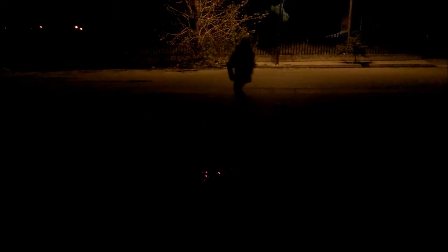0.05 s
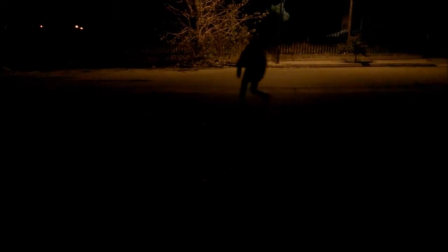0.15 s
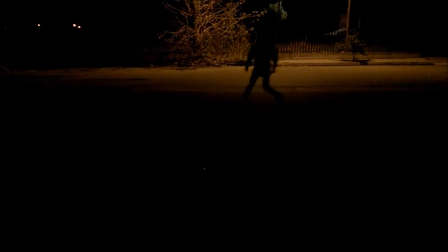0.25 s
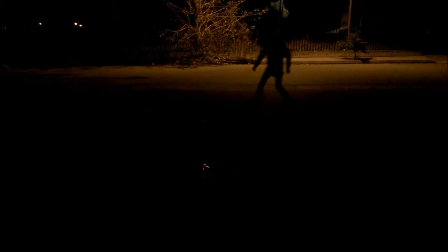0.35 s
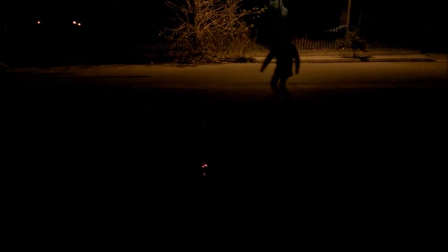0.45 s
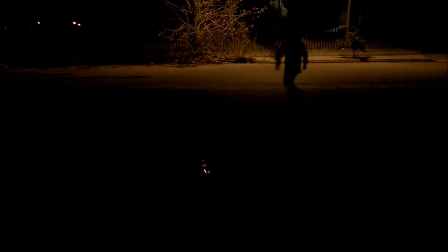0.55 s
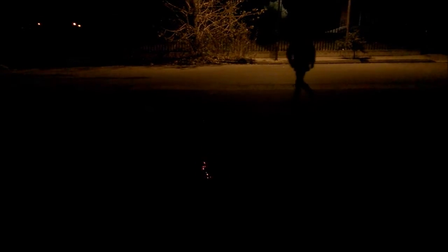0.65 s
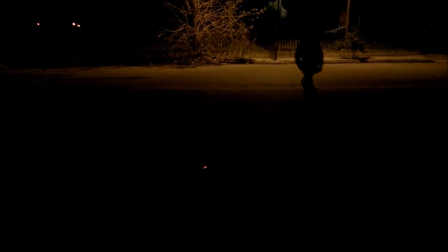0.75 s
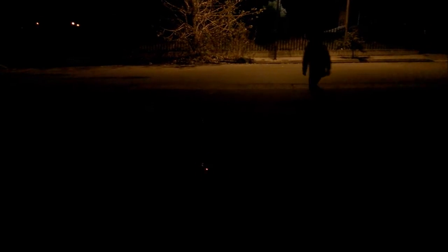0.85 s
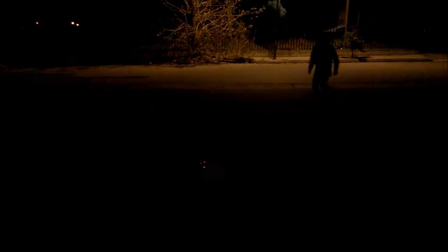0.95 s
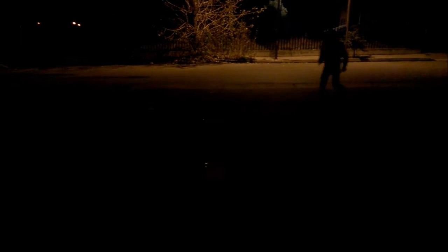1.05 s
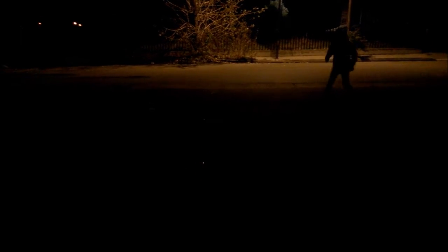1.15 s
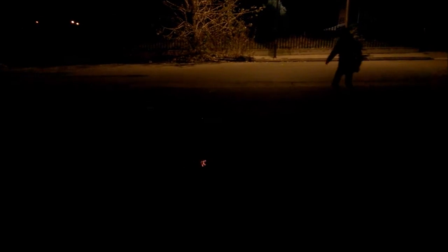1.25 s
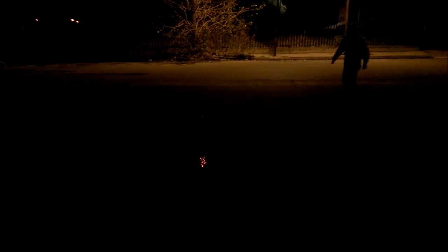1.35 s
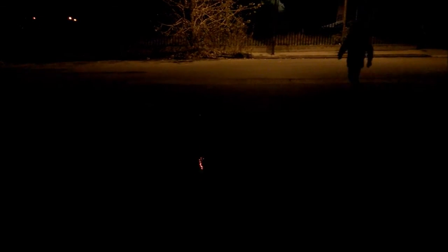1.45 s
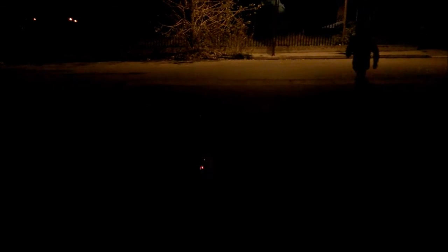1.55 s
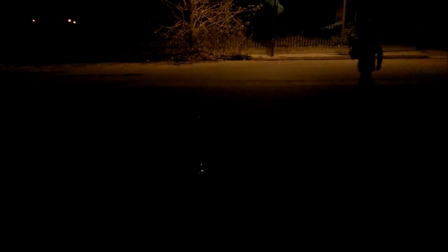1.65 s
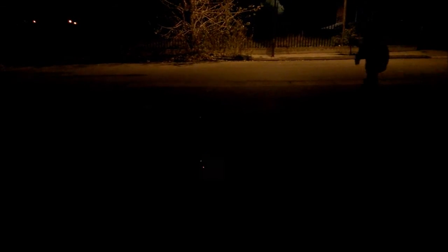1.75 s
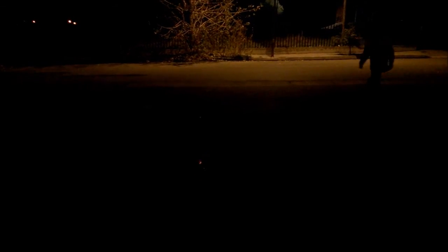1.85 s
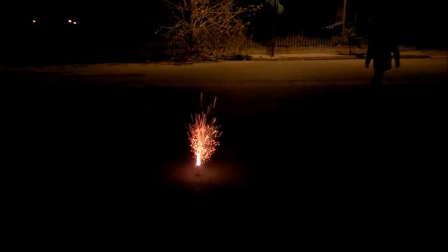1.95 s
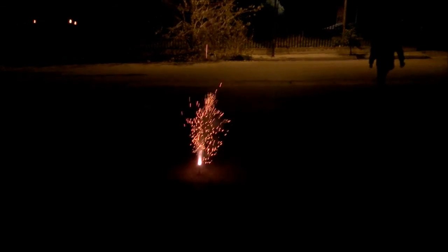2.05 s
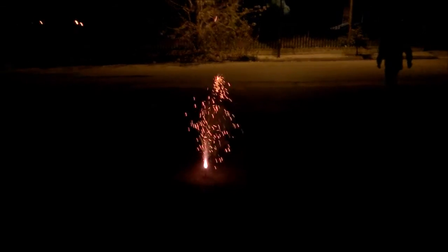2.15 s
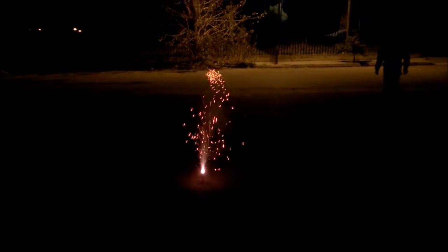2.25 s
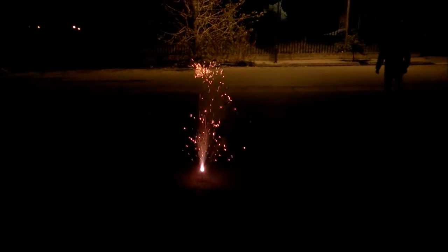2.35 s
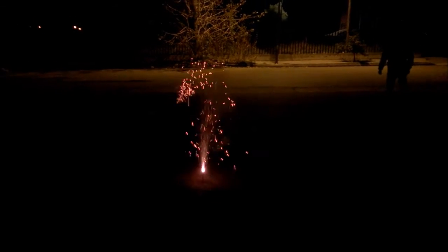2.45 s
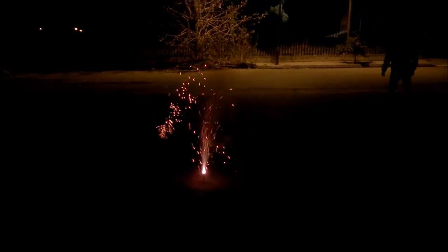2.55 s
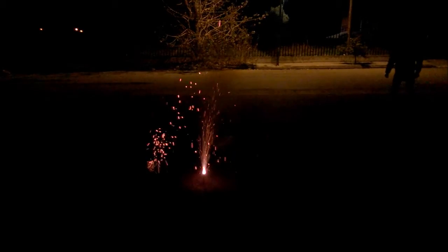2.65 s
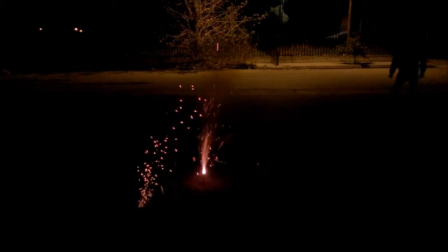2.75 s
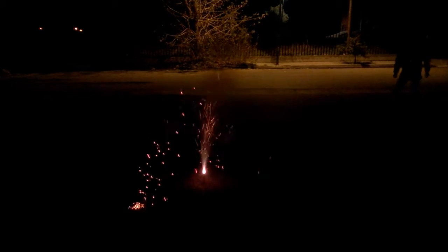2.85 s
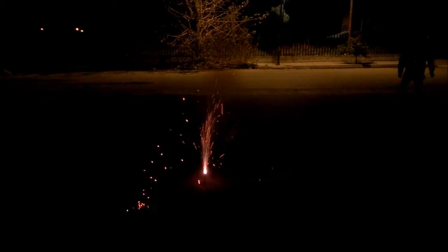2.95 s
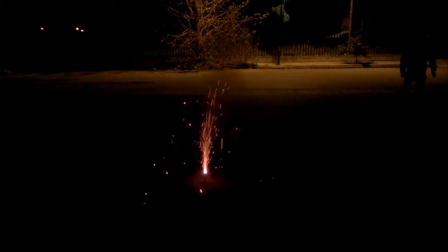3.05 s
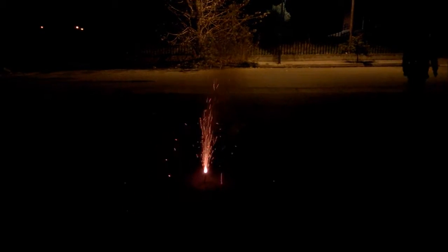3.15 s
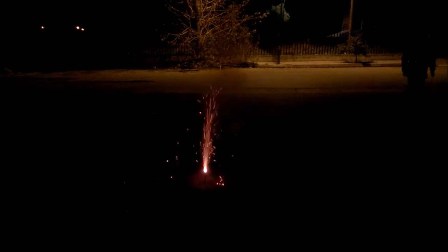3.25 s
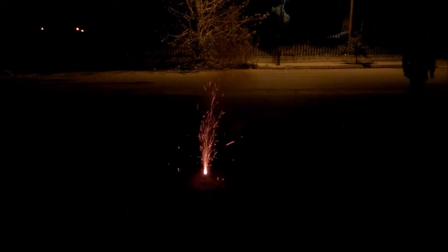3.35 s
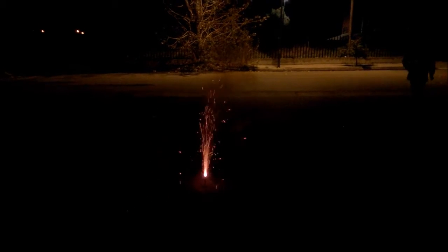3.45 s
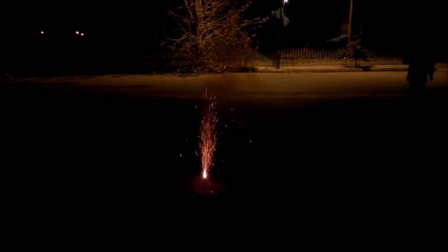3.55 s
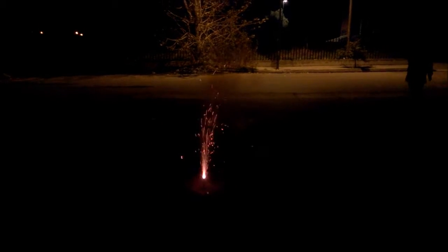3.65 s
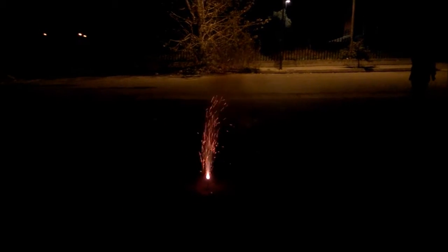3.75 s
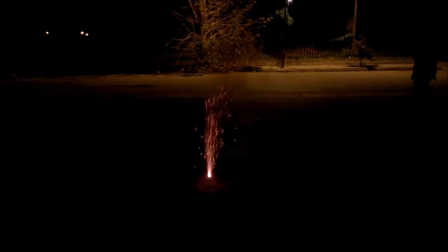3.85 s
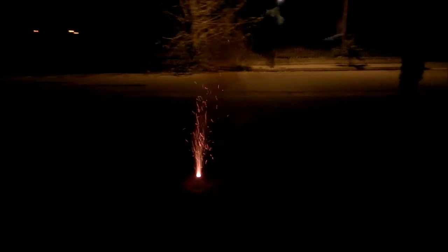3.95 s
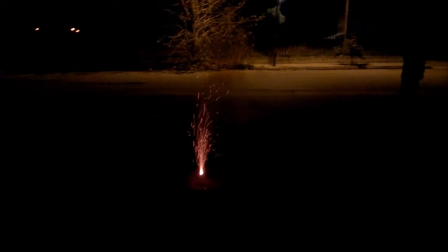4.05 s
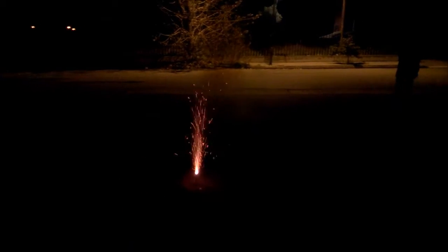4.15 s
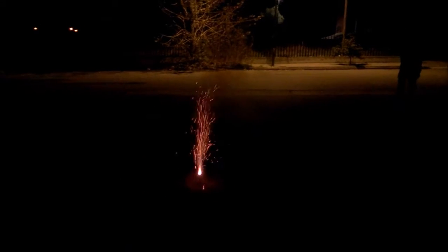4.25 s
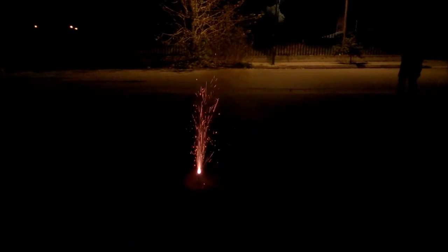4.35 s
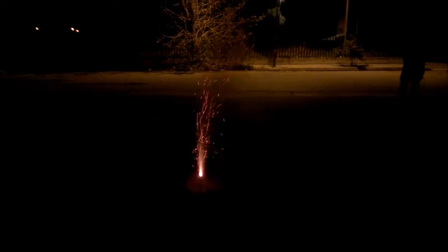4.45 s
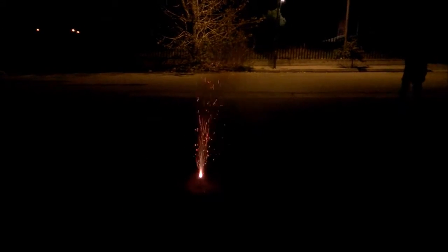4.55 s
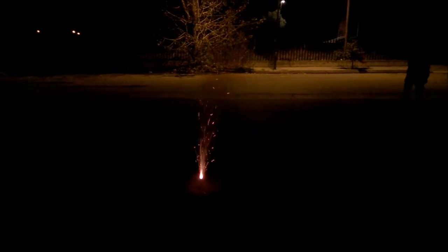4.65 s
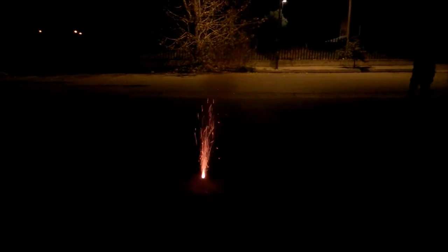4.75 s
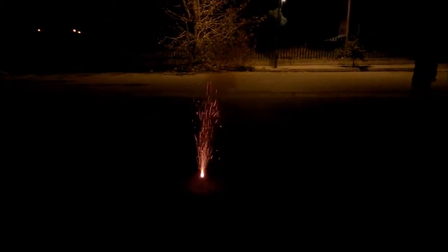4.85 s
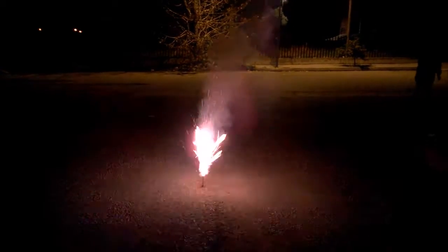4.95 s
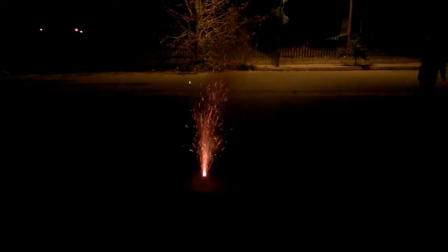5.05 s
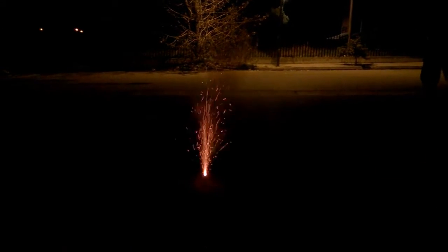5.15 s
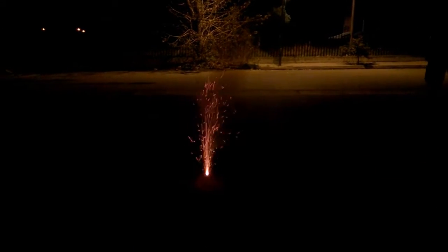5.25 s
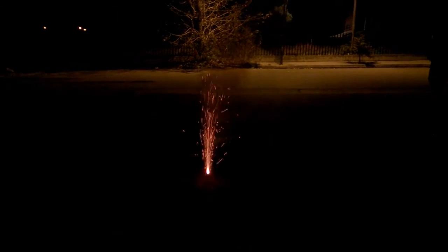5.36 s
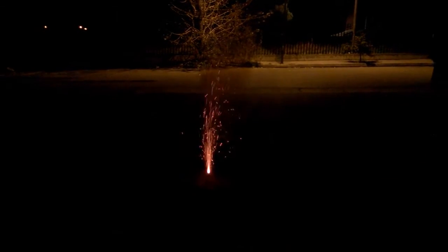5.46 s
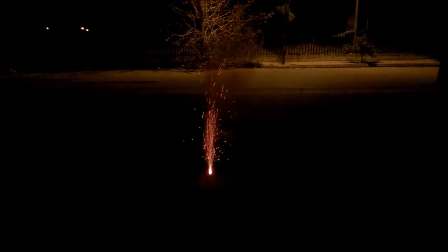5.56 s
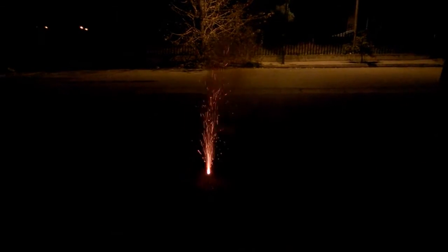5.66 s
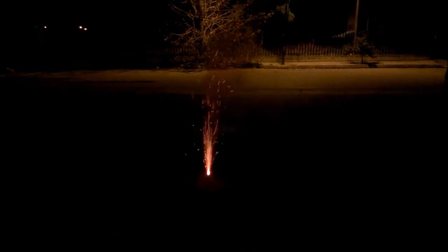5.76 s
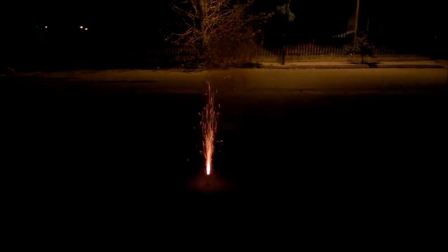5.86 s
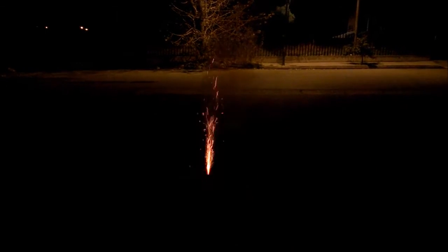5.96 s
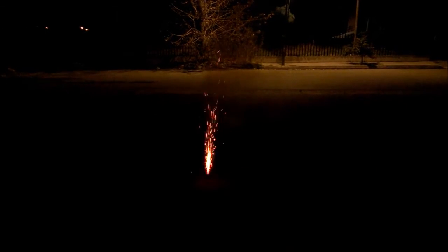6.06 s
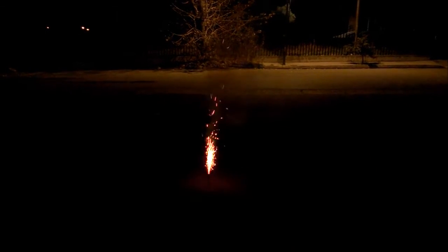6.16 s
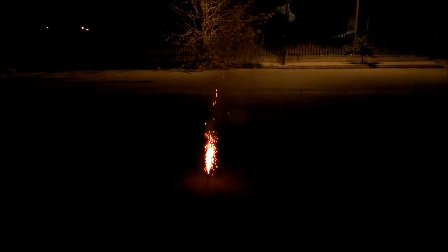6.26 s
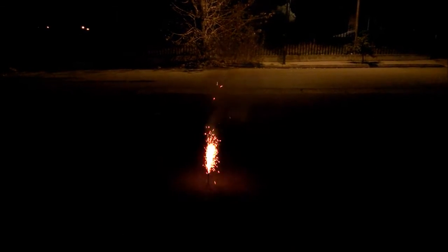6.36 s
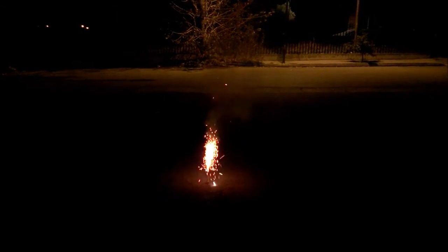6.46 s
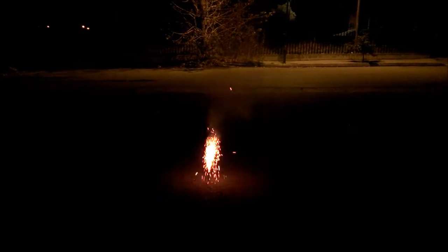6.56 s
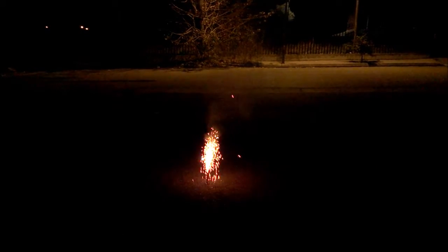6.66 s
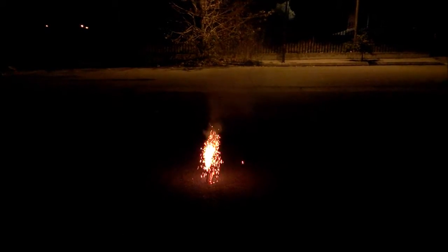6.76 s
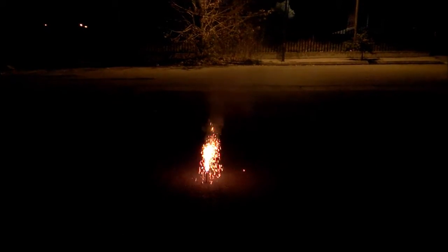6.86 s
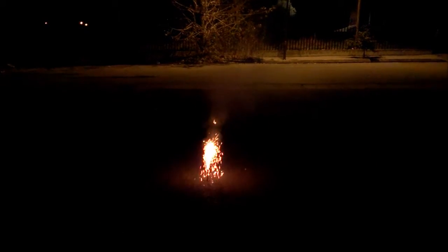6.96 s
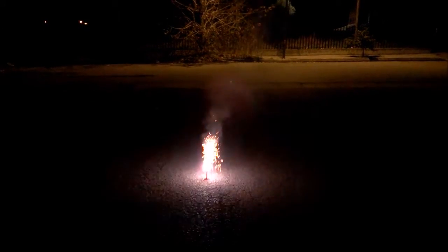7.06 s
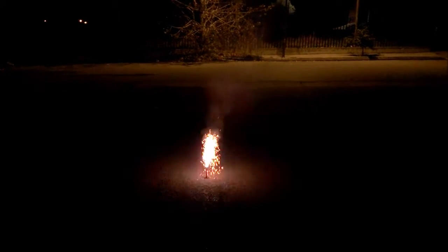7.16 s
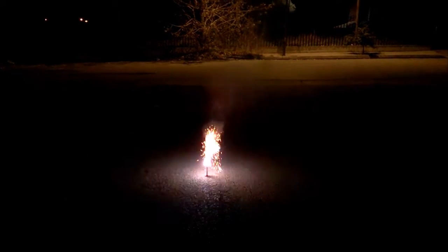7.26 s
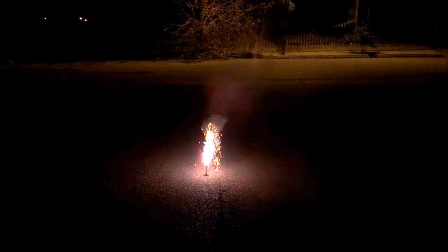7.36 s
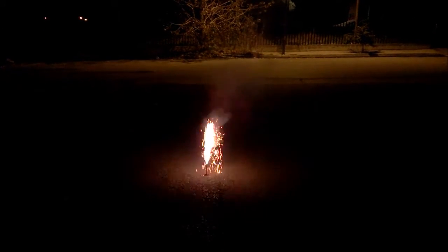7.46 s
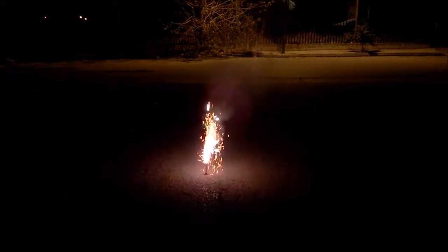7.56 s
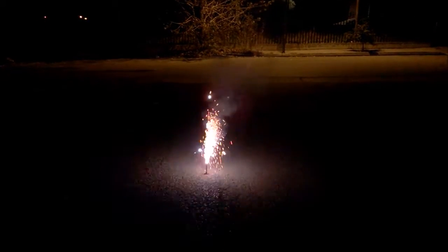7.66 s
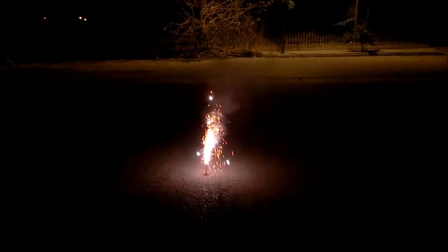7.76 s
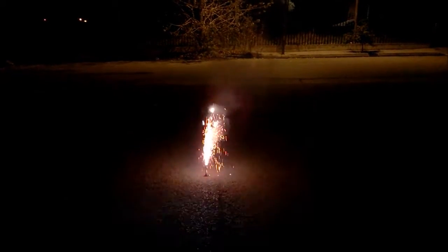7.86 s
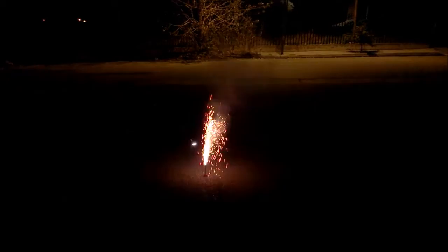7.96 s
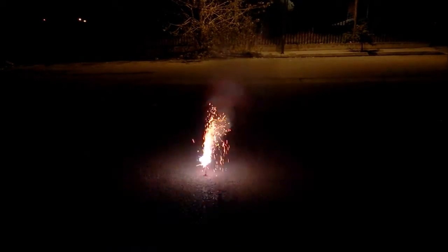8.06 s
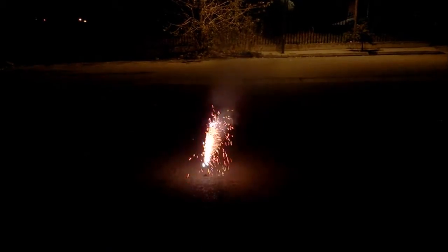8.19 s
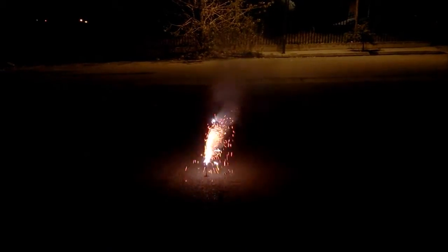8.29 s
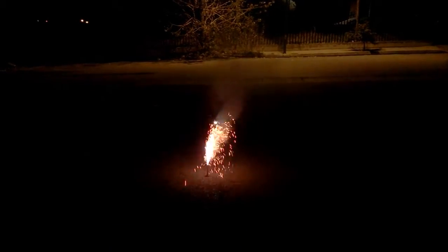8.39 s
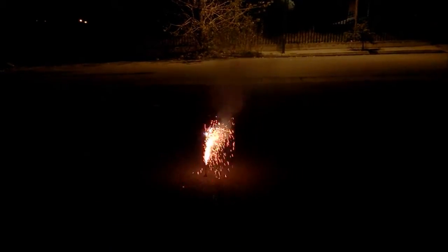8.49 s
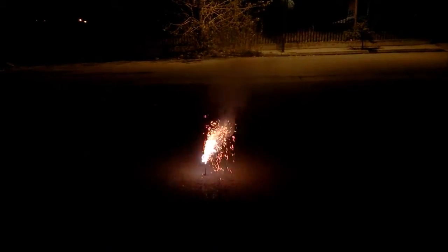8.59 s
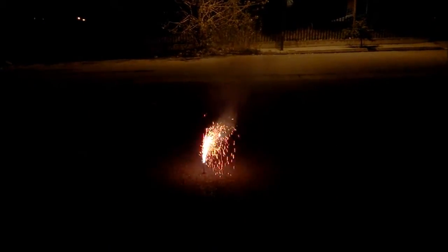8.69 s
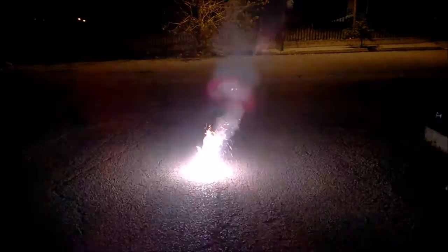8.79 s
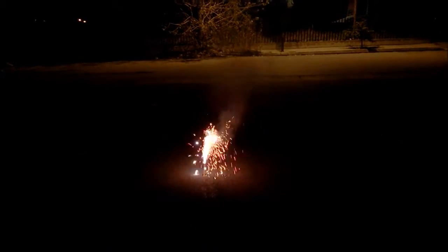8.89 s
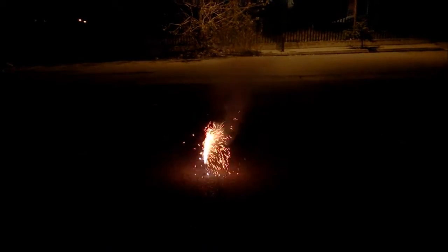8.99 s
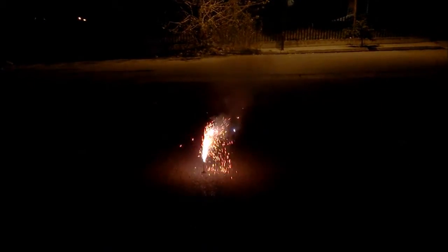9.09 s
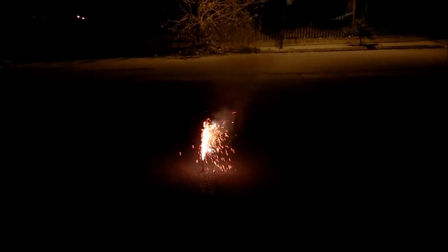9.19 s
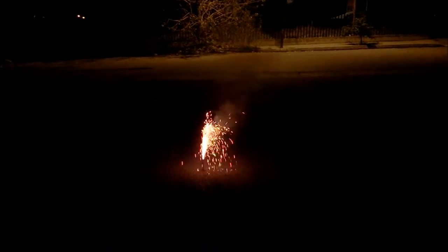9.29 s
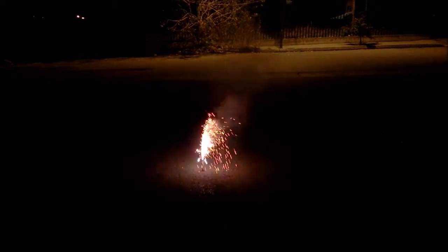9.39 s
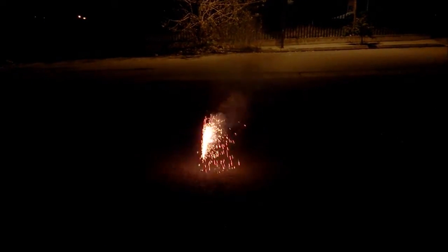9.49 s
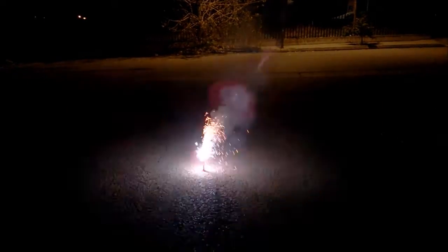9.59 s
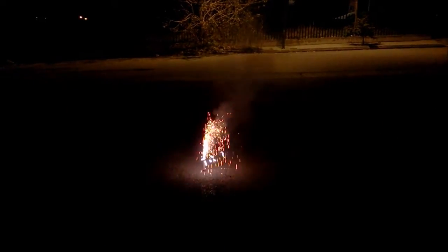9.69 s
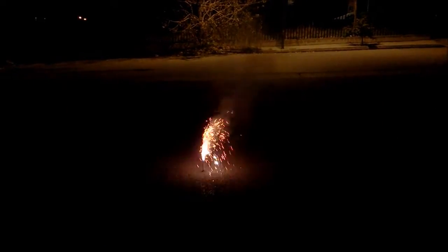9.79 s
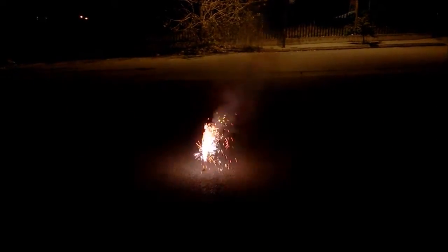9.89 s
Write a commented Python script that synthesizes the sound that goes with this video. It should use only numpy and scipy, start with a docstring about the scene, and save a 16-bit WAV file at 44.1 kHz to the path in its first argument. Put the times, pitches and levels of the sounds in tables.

```python
"""Whistling firework fountain

A fuse fizzes and footsteps knock and scuff on a street at night, over a low distant rumble.
The whistle bursts in and slides down as the fuel burns back into its tube: phase-locked sine lines and
puffing jet noise. It sputters once, then dies away between house fronts (noise impulse response).
The fountain then throws soft, hissing spurts of shaped noise, with a few pops from pressure spikes."""
import sys
import numpy as np
from scipy import signal
from scipy.fft import rfft, irfft
from scipy.io import wavfile
from scipy.ndimage import uniform_filter1d, minimum_filter1d, map_coordinates

SR = 44100
rng = np.random.default_rng(int(sys.argv[2]) if len(sys.argv) > 2 else 0)


def bounce(signal):
    """Save signal as a 16-bit WAV file at the path given by the first command-line argument."""
    frames = np.transpose(np.atleast_2d(signal))
    limited = np.clip(frames, -1, 1)
    pcm = np.round(limited * 32767).astype(np.int16)
    wavfile.write(sys.argv[1], SR, pcm)


N = 437913
TIME = np.arange(N) / SR
TOP_HZ = 15650

# Turbulence of the exhaust. Each row: time in seconds, jet hiss in dB, half-pitch lines in dB, roar in dB.
TURBULENCE = [(1.96, -12, -21.5, -49), (2.22, -22, -15.5, -38), (2.65, -14, -17, -41.5),
              (3.35, -19, -20, -43.5), (3.65, -22.5, -18, -59.5), (4.25, -28, -28, -59),
              (4.36, -34, -25, -59), (4.87, -39.5, -33, -56), (4.94, -36, -18, -46),
              (5.04, -30.5, -25, -48.5), (5.13, -18.5, -16.5, -37.5), (5.45, -25, -19, -49.5),
              (5.8, -22.5, -20.5, -66), (5.95, -39, -36, -45)]
# Spectrum of the jet and the half-pitch lines. Each row: frequency in Hz, level in dB.
JET_COLOUR = [(900, -18), (1700, -26), (2400, -7.5), (3300, 4), (4400, -11), (5200, -5), (6200, -2.5),
              (7100, 7.5), (8500, -6), (10100, 4), (11300, -2.5), (13500, -5), (15500, -24.5)]
# Brief lulls in the rushing noise. Each row: centre in seconds, depth in dB.
LULLS = [(2.152, -19.5), (2.256, -8), (2.471, -9), (3.3, -6), (3.47, -5.5), (4.32, -11.5), (4.67, -13),
         (5.025, -16.5), (5.16, -7), (5.225, -9), (5.31, -2.5), (5.7, -16.5), (5.772, -10.5)]
# Spectrum of the exhaust roar and the pops' noise. Each row: frequency in Hz, level in dB.
ROAR_COLOUR = [(150, -13), (280, -0.5), (500, -5.5), (900, -4), (1500, -11), (2500, -10)]
# Spurts of sparks. Each row: start in seconds, hiss in dB, flame in dB, 60 dB decay of the hiss in seconds.
SPURTS = [(6.467, -52, -55.5, 0.14), (6.592, -64, -61, .15), (6.927, -49, -51, 0.44),
          (7.124, -53, -62, 0.38), (7.203, -57, -53, 0.49), (7.332, -50.5, -52, .25),
          (7.406, -45, -72, 0.75), (7.578, -49, -50, 0.35), (7.687, -57, -75, 0.31),
          (7.74, -47.5, -60, 0.23), (7.822, -45, -50, 0.48), (8.026, -70, -62, 0.33),
          (8.1, -59, -48.5, 0.57), (8.281, -56.5, -62, 0.42), (8.35, -54, -53.5, 0.36),
          (8.444, -54.5, -53, 0.35), (8.653, -46.5, -57, 0.18), (8.834, -53, -55, .3),
          (8.9, -53, -48.5, 0.2), (9.004, -53, -60, 0.37), (9.09, -69, -54, .2), (9.17, -51, -63, 0.71),
          (9.446, -53, -52.5, 0.58), (9.705, -49.5, -53, .3), (9.79, -54, -69, 0.13)]

START_S, END_S = 1.957, 5.963  # whistle burn
LULL_S = .014
SPUTTER_S = 5.0


def undb(db):
    """Decibels to gain."""
    return 10 ** (np.asarray(db) / 20)


def unit(x):
    """Scale to rms 1."""
    return x / np.sqrt(np.mean(x ** 2))


def curves(table):
    """The columns of a table, joined by straight lines in time."""
    s, *columns = np.transpose(table)
    return [np.interp(TIME, np.sort(s), c) for c in columns]


def between(start, end, fade):
    """1 from start to end, with short ramps outside."""
    return np.clip(1 + np.minimum(TIME - start, end - TIME) / fade, 0, 1)


def bumps(rows, width):
    """A dB curve with one rounded bump or dip for each (s, dB) row."""
    out = np.zeros(N)
    for s, db in rows:
        near = slice(max(int((s - 4 * width) * SR), 0), int((s + 4 * width) * SR))
        out[near] += db * np.exp(-((TIME[near] - s) / width) ** 2)
    return out


def bursts(rows, rise):
    """Summed envelopes of (s, dB, 60 dB decay s) bursts, each cut off after 1 s."""
    out = np.zeros(N + SR)
    age = TIME[:SR]
    for s, db, t60 in rows:
        start = int(s * SR)
        decay = np.exp(-np.log(1000) * age / max(t60, .005))
        out[start:start + SR] += undb(db) * (1 - np.exp(-age / rise)) * decay
    return out[:N]


def colour_at(hz, points):
    """Gain of a (Hz, dB) spectrum, falling 24 dB per octave past its ends."""
    f, db = np.transpose(points)
    octave = np.log2(np.maximum(hz, 1))
    outside = np.abs(octave - np.clip(octave, np.log2(f[0]), np.log2(f[-1])))
    return undb(np.interp(octave, np.log2(f), db) - 24 * outside)


def shape(x, points):
    """Filter a signal by a (Hz, dB) spectrum, then scale to rms 1."""
    return unit(irfft(rfft(x) * colour_at(np.arange(N // 2 + 1) * SR / N, points), N))


def lowpass(x, hz, order=2):
    """Butterworth low-pass."""
    return signal.sosfilt(signal.butter(order, min(hz, SR / 2 - 1), fs=SR, output="sos"), x)


def resonance(x, hz, q):
    """One resonance with gain 1 at its centre."""
    return signal.lfilter(*signal.iirpeak(hz, q, fs=SR), x)


def noise():
    """White noise of rms 1."""
    return rng.standard_normal(N)


def wander(hz):
    """Random motion up to about the given rate, rms 1 before its extremes are clipped."""
    return np.clip(unit(lowpass(noise(), hz)), -2.3, 2.3)


def town():
    """A low distant rumble whose bass swells and sinks; it fades to a fainter level from 2 to 4 s."""
    # Spectrum of the night town. Each row: frequency in Hz, level in dB.
    town_colour = [(12, -38), (20, -9.5), (43, -9.5), (59, -2), (171, -23.5), (237, -23), (442, -30),
                   (597, -30), (1280, -30), (2230, -38.5), (2440, -37), (3300, -44.5), (5000, -46.5),
                   (6500, -77.5), (11000, -120)]
    early_db, late_change_db = -50.5, -12
    late = np.clip((TIME - 2) / 2, 0, 1)
    bed = shape(noise(), town_colour)
    bass = lowpass(bed, 130)
    swelling = bed + bass * (undb(2.2 * wander(7)) - 1)
    return swelling * undb(early_db + late_change_db * late)


def fuse():
    """The fuse fizzes faintly: treble noise with a fast random flicker."""
    # Fuse level. Each row: time in seconds, level in dB.
    fuse_level = [(0, -67), (.2, -63), (.6, -70), (1.0, -66), (1.1, -69), (1.3, -65), (1.95, -64),
                  (2.0, -90)]
    # Fuse spectrum. Each row: frequency in Hz, level in dB.
    fuse_colour = [(3000, -14), (5000, -8.5), (7200, 1.5), (8600, -4), (10500, -4), (15000, -13)]
    db, = curves(fuse_level)
    return shape(noise() * undb(2.8 * wander(90)), fuse_colour) * undb(db)


def walker():
    """Heels knock on asphalt (resonant low noise) and soles scuff over grit (band of noise)."""
    # Footsteps. Each row: start in seconds, level in dB, knock resonance in Hz.
    heel_rows = [(.035, -53, 600), (.309, -52, 620), (0.374, -44, 650), (.776, -50.5, 760),
                 (1.155, -55, 600), (1.695, -49, 520)]
    # Scuffs. Each row: start in seconds, level in dB.
    scuff_rows = [(.168, -54), (.846, -51.5)]
    steps = np.zeros(N)
    for s, db, hz in heel_rows:
        knock = unit(resonance(lowpass(noise(), 750), hz, q=2.4))
        steps += knock * bursts([(s, db, .09)], rise=0.00053)
    grit = unit(resonance(resonance(noise(), 2600, q=3.0), 2600, q=3.0))
    return steps + grit * bursts([(s, db, .08) for s, db in scuff_rows], rise=0.0028)


def chuffs():
    """Regular surges of the young flame before it settles, in dB."""
    peak_s, period_s, end_s, depth_db = 2.02, .0875, 2.46, 3
    surge = np.cos(2 * np.pi * (TIME - peak_s) / period_s)
    return depth_db * surge * between(peak_s, end_s, .04)


def sputter():
    """The burn stalls quickly and recovers more slowly, in dB."""
    fall_s, rise_s, depth_db = 0.013, 0.025, -16.5
    age = TIME - SPUTTER_S
    return depth_db * np.exp(-(age / np.where(age < 0, fall_s, rise_s)) ** 2)


def partials(multiples, hz, phase, slip, colour, slope_db, flicker_db):
    """A stack of lines with total rms near 1; each flickers and swells a little on its own."""
    out, power = 0, 1e-12
    for k in multiples:
        top_fade = np.clip((TOP_HZ + 1000 - k * hz) / 1000, 0, 1)
        gain = colour_at(k * hz, colour) * undb(slope_db * np.log2(k)) * top_fade
        flicker = undb(flicker_db * wander(73) + .7 * wander(11))
        out = out + gain * flicker * np.sin(k * phase + slip)
        power = power + gain ** 2 / 2
    return out / np.sqrt(power)


def jet(hz):
    """Turbulent gas puffs; each disturbance returns two cycles later, so the hiss gathers round the lines."""
    gas = noise() * undb(1.2 * wander(120))
    lag = 2 * SR / hz  # samples
    rung = gas
    for _ in range(3):
        rung = gas + .62 * map_coordinates(rung, [np.arange(N) - lag], order=3)
    return shape(rung, JET_COLOUR)


def whistle():
    """Fuel pulses lock to the tube's resonance; alternating strong and weak ones add half-pitch lines."""
    # Tube resonance: sinks as fuel burns back, flips up as it runs out. Each row: time in seconds, pitch in Hz.
    pitch = [(1.96, 4433), (1.99, 4660), (2.05, 4830), (2.15, 4948), (2.34, 4683), (2.39, 4678),
             (2.85, 4204), (3.02, 4045), (3.32, 3865), (3.37, 3793), (3.82, 3584), (4.51, 3243),
             (5.0, 3090), (5.04, 2997), (5.29, 2855), (5.61, 2770), (5.65, 2756), (5.88, 2681),
             (5.93, 2764), (5.96, 3015)]
    # Whistle strength. Each row: time in seconds, fundamental in dB, overtones in dB.
    strength = [(1.96, -10, -23.5), (2.02, -11, -17), (2.35, -12.5, -24), (2.6, -18.5, -24),
                (3.05, -13.5, -21), (3.17, -17.5, -13.5), (3.8, -12.5, -13), (4.25, -14, -11.5),
                (4.95, -12.5, -13), (5.06, -9.5, -14), (5.23, -11.5, -17), (5.7, -11.5, -12.5),
                (5.9, -13, -12.5), (5.96, -18, -17)]
    # Unevenness of the burn. Each row: time in seconds, phase scatter of the half-pitch lines in radians.
    unevenness = [(1.96, .35), (2.1, .5), (2.3, 1.3), (2.8, 1.2), (3.2, .8), (3.6, .45), (4.9, .25),
                  (5.2, .38), (5.9, .45)]
    # Lowest half-pitch line: surges at ignition, then comes and goes. Each row: time in seconds, level in dB.
    undertone = [(1.96, -17.5), (2.01, -13), (2.18, -36), (3.2, -39), (4.25, -40.5), (4.85, -52),
                 (4.94, -36), (5.2, -39), (5.95, -48.5)]
    # Overtone spectrum. Each row: frequency in Hz, level in dB.
    overtone_colour = [(5400, -4.5), (6300, -2), (6900, 6), (7600, -0.5), (8200, 0), (8800, -2),
                       (9500, 4.5), (10200, 12.5), (10900, 0), (11600, -5.5), (12700, -5), (13600, -7.5),
                       (15500, -23.5)]
    attack_s, release_s = 0.019, 0.0071
    waver_share, waver_s = .02, .045  # pitch waver round the sputter
    spit_lead_s, spit_length_s, spit_db = .014, .011, -20  # hiss spat out just before the stall

    hz, = curves(pitch)
    tone_db, overtone_db = curves(strength)
    jet_db, half_db, _ = curves(TURBULENCE)
    uneven, = curves(unevenness)
    under_db, = curves(undertone)
    lull_db = bumps(LULLS, LULL_S)

    hz = hz * (1 + waver_share * wander(65) * np.exp(-((TIME - SPUTTER_S) / waver_s) ** 2))
    lurch = np.minimum(np.abs(np.gradient(hz)) * SR / 8000, 1)  # 1 at 8000 Hz/s
    hz = hz * (1 + 0.0029 * wander(45))
    # cycles scatter more when the burn is uneven or the pitch lurches
    scatter = 0.0045 * np.sqrt(np.abs(uneven)) * undb(lull_db) + 0.0054 * lurch
    phase = 2 * np.pi * np.cumsum(hz * (1 + scatter * wander(700))) / SR

    tone_db = tone_db + chuffs() + .5 * wander(300) + 1.5 * uneven * wander(28)
    tone = np.sqrt(2) * np.sin(phase) * undb(tone_db)
    overtones = partials(range(2, 6), hz, phase, 0, overtone_colour, slope_db=-1.1, flicker_db=1.5)
    overtones = overtones * undb(overtone_db)
    # the alternation keeps slipping, so its lines are smeared
    slip = uneven * wander(260)
    halves = partials(np.arange(1, 6) + .5, hz, phase, slip, JET_COLOUR, slope_db=1.9, flicker_db=0.5)
    halves = halves * undb(half_db + 0.41 * lull_db + 1.5 * wander(25))
    under = np.sqrt(2) * np.sin(phase / 2 + 0.86 * slip) * undb(under_db + lull_db + 3.2 * wander(20))

    stall_db = sputter()
    spit = undb(spit_db) * np.exp(-((TIME - SPUTTER_S + spit_lead_s) / spit_length_s) ** 2)
    hiss = jet(hz) * (undb(jet_db + lull_db + stall_db) + spit)
    burning = np.clip((TIME - START_S) / attack_s, 0, 1) * np.clip((END_S - TIME) / release_s, 0, 1)
    return ((tone + overtones + halves + under) * undb(stall_db) + hiss) * burning


def blast():
    """The exhaust buffets the air in gusts, lifted most by the ignition flare: low rumble plus roar."""
    # Rumble spectrum. Each row: frequency in Hz, level in dB.
    rumble_colour = [(20, -5), (45, 4), (110, 0), (200, -7.5), (330, -17), (500, -26)]
    # Strong gusts of exhaust. Each row: centre in seconds, rise in dB.
    gust_rows = [(2.2, 9.5), (2.38, 9.5), (3.24, 6.5), (3.35, 9), (3.58, 3.5), (4.54, 6.5), (4.96, 3.5),
                 (5.11, 6), (5.19, 7)]
    gust_s, attack_s, release_s = .025, 0.05, 0.19
    start_rumble_db, growth_db_per_s = -39, 0.18
    flare_s, flare_end_s, flare_fade_s = 1.985, 2.062, .045
    flare_rumble_db, flare_roar_db = 26, 23.5

    _, _, roar_db = curves(TURBULENCE)
    flare = between(flare_s, flare_end_s, flare_fade_s)
    swell_db = bumps(gust_rows, gust_s) + bumps(LULLS, LULL_S)
    rumble_db = start_rumble_db + growth_db_per_s * (TIME - START_S) + flare_rumble_db * flare + swell_db
    roar_db = roar_db + flare_roar_db * flare + swell_db + 0.28 * chuffs()
    buffeting = wander(28.15) * (1 - flare / 2)
    rumble = unit(shape(noise(), rumble_colour) * undb(3.0 * buffeting)) * undb(rumble_db)
    roar = unit(shape(noise(), ROAR_COLOUR) * undb(2.7 * buffeting)) * undb(roar_db)
    attack = np.clip((TIME - START_S) / attack_s, 0, 1)
    release = np.clip((END_S - TIME) / release_s, 0, 1) ** 2
    return (rumble + roar) * attack * release


def choke():
    """Slag narrows the nozzle just before each spurt and lets go at once."""
    depth_db, length_s = -7, .016
    db = np.zeros(N)
    for s, *_ in SPURTS:
        before = slice(int(s * SR) - SR // 10, int(s * SR))
        db[before] += depth_db * np.exp(-((TIME[before] - s) / length_s) ** 2)
    return undb(db)


def spray():
    """Countless tiny sparks hiss from a nozzle that burns wider; spurts break loose, the flame flutters."""
    # Steady flow. Each row: time in seconds, hiss in dB.
    steady_flow = [(6.45, -67.5), (6.9, -62), (7.15, -50.5), (7.48, -51), (7.7, -56.5), (8.0, -54.5),
                   (8.25, -60), (8.58, -65), (8.8, -56), (9.3, -60), (9.6, -62), (9.93, -54)]
    # Spectrum with the nozzle fresh. Each row: frequency in Hz, level in dB.
    fresh_colour = [(900, -19), (1600, -7), (2400, 5.5), (3300, -8.5), (4500, -19), (5500, -11),
                    (7000, 4.5), (8400, -11), (10000, -3.5), (12500, -11.5), (15500, -21)]
    # Spectrum with the nozzle burnt wider. Each row: frequency in Hz, level in dB.
    wide_colour = [(900, -3.5), (1500, 3.5), (2000, 9.5), (2800, 3.5), (4000, -6.5), (4900, 2), (5400, 0.5),
                   (7100, 7.5), (8400, 2), (10000, 9), (12500, -2), (15500, -3)]
    # Flame spectrum. Each row: frequency in Hz, level in dB.
    flame_colour = [(80, -13), (170, 3), (280, 1.5), (420, -7.5), (800, -6), (1500, -18)]
    flame_db, flame_t60_s = -12, 0.23  # steady flutter relative to hiss; decay after a spurt
    slow_flicker_db, quick_flicker_db = 2, 1.4

    hiss_db, = curves(steady_flow)
    sparks = noise() * undb(2.36 * rng.exponential(size=N).clip(0, 7)) * undb(1.1 * wander(220))
    # larger sparks snap at random, 90 per second on average
    snaps = (rng.random(N) < 90 / SR) * undb(2.5 * rng.exponential(size=N).clip(0, 2.5))
    snap_decay = np.exp(-1 / (0.00016 * SR))
    sparks = unit(sparks) + 2.5 * noise() * signal.lfilter([1], [1, -snap_decay], snaps)
    worn = np.clip((TIME - 7.8) / 0.77, 0, 1)
    hiss = np.sqrt(1 - worn) * shape(sparks, fresh_colour) + np.sqrt(worn) * shape(sparks, wide_colour)

    steady = undb(hiss_db + slow_flicker_db * wander(25.7))
    hiss_spurts = bursts([(s, db, t60) for s, db, _, t60 in SPURTS], rise=0.0007)
    flow = np.hypot(steady, hiss_spurts) * undb(quick_flicker_db * wander(60))
    steady_flame = undb(hiss_db + flame_db + 2.5 * wander(27.4))
    flame_spurts = bursts([(s, db, flame_t60_s) for s, _, db, _ in SPURTS], rise=0.0035)
    flutter = np.hypot(steady_flame, flame_spurts)
    flame = shape(noise(), flame_colour) * flutter
    return (hiss * flow + flame) * choke() * between(6.45, TIME[-1], 0.049)


def pops():
    """A bursting spark sends a steep pressure spike, then a longer suction, with a faint noise tail."""
    # Popping sparks. Each row: start in seconds, relative level in dB.
    pop_rows = [(6.468, -37), (6.851, -36), (7.824, -52), (8.105, -57), (8.443, -45), (8.9019, -24),
                (8.914, -29), (8.929, -45), (9.706, -33)]
    spikes = np.zeros(N)
    for s, db in pop_rows:
        age = np.maximum(TIME - s, 0)
        pressure = 1.48 * np.exp(-age / 0.00043) - 0.87 * np.exp(-age / 0.001)
        spikes += undb(db) * (TIME >= s) * pressure
    tails = shape(noise(), ROAR_COLOUR) * bursts([(s, db, .09) for s, db in pop_rows], rise=.0005)
    return 1.66 * lowpass(spikes, 4200) + undb(-28) * tails


def street(x, wet_db, t60_mid, t60_high):
    """House fronts answer with blurred echoes and a thin tail in which air swallows the treble first."""
    # House fronts. Each row: delay in seconds, level in dB.
    echo_rows = [(.021, -18), (.062, -22), (.108, -22.5), (.19, -26.5)]
    age = TIME[:2 * SR]
    freq = np.arange(SR + 1)[1:] / 2
    white = rfft(rng.standard_normal(len(age)))
    centres = [250, 2800, 5600, 8400, 11200, 15000]  # Hz
    response = np.zeros(len(age))
    for hz, share in zip(centres, np.eye(len(centres))):
        above_mid = max(hz - centres[1], 0) / (centres[4] - centres[1])
        t60 = t60_mid * (t60_high / t60_mid) ** above_mid
        band = irfft(white * np.r_[0, np.interp(freq, centres, share)])
        response += band * undb(-.6 * hz / 1000) * np.exp(-np.log(1000) * age / t60)
    response *= np.clip(age / 0.024, 0, 1)
    response *= undb(wet_db) / np.sqrt(np.sum(response ** 2))
    slaps = np.zeros(len(age))
    for delay, db in echo_rows:
        scatter = rng.standard_normal(len(age)) * np.exp(-((age - delay) / 0.0091) ** 2)
        slaps += undb(db) * scatter / np.sqrt(np.sum(scatter ** 2))
    return signal.fftconvolve(x, response + lowpass(slaps, 11000, order=3))[:N]


def scene():
    """All layers lie straight ahead, the same in both ears; only the firework echoes."""
    firework = whistle() + blast() + spray() + pops()
    echoes = street(firework, wet_db=-23, t60_mid=1.4, t60_high=.75)
    mono = firework + echoes + walker() + fuse() + town()
    return np.array([mono, mono])


def record(dry):
    """A fast limiter and soft clipping hold the peaks, then the top is cut."""
    headroom = np.minimum(1, 1.1 / (np.abs(dry).max(axis=0) + 1e-9))
    limited = dry * uniform_filter1d(minimum_filter1d(headroom, size=200), size=200)
    rounded = limited / (1 + (limited / .96) ** 20) ** (1 / 20)
    return signal.sosfiltfilt(signal.ellip(10, .05, 50, TOP_HZ, fs=SR, output="sos"), rounded)


dry = scene()
out = record(dry)
bounce(out)
```